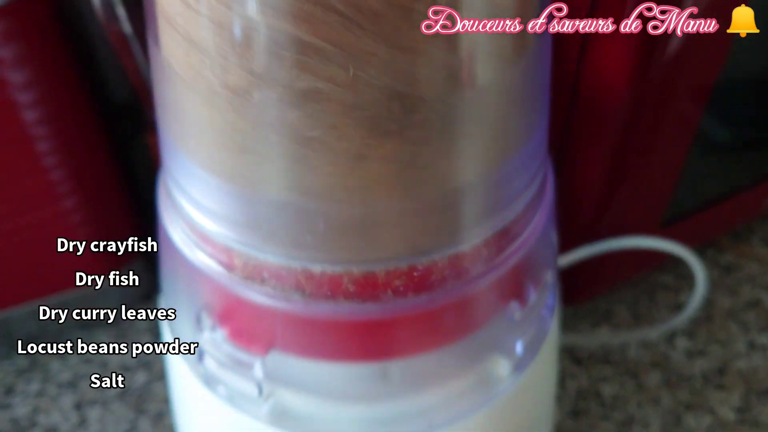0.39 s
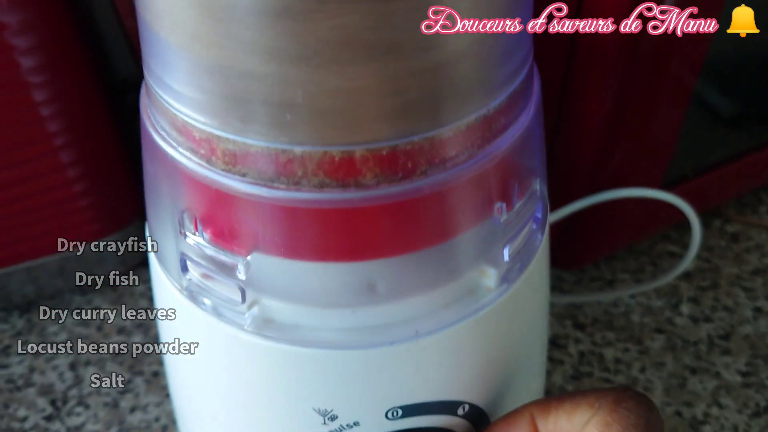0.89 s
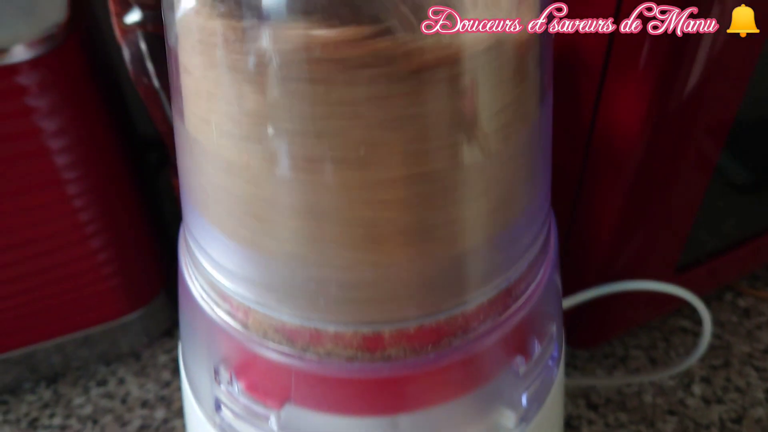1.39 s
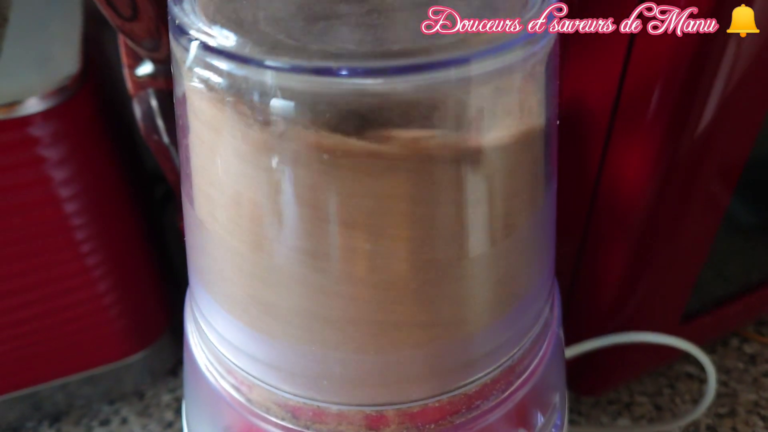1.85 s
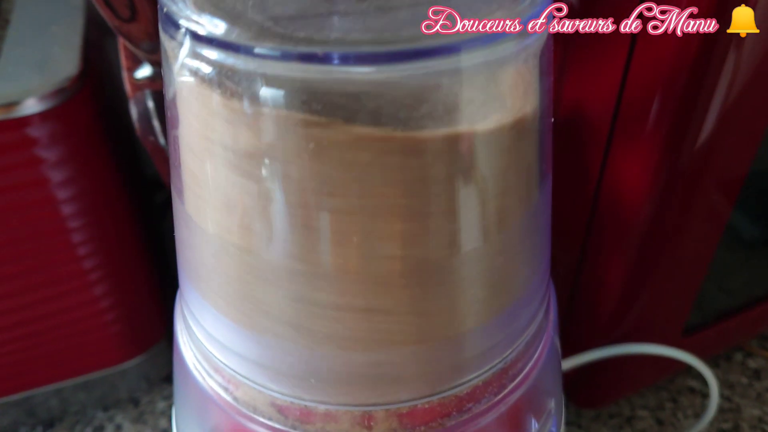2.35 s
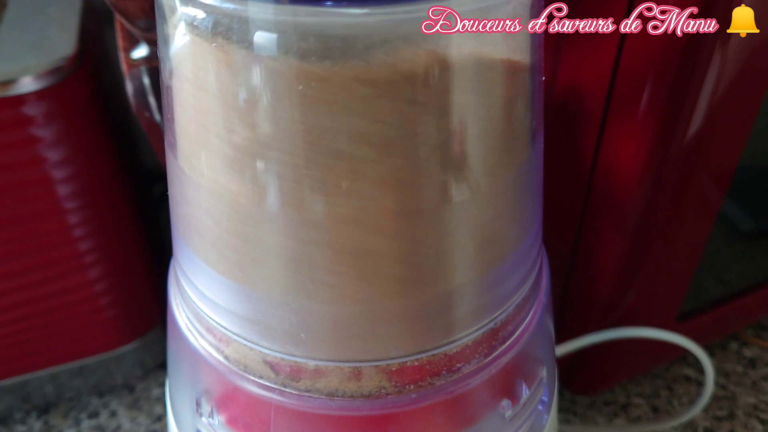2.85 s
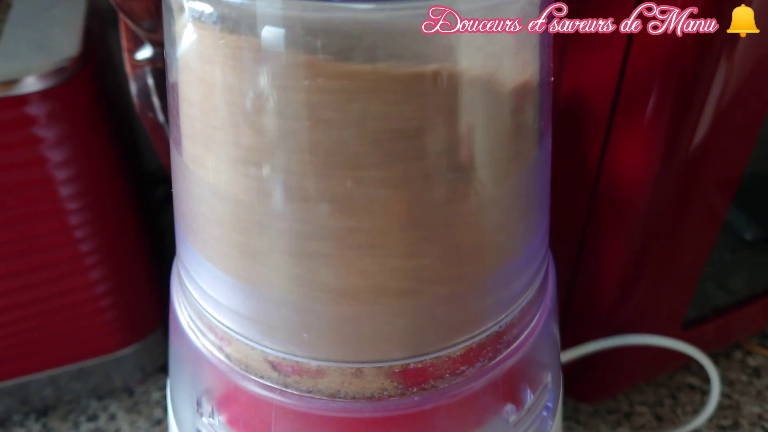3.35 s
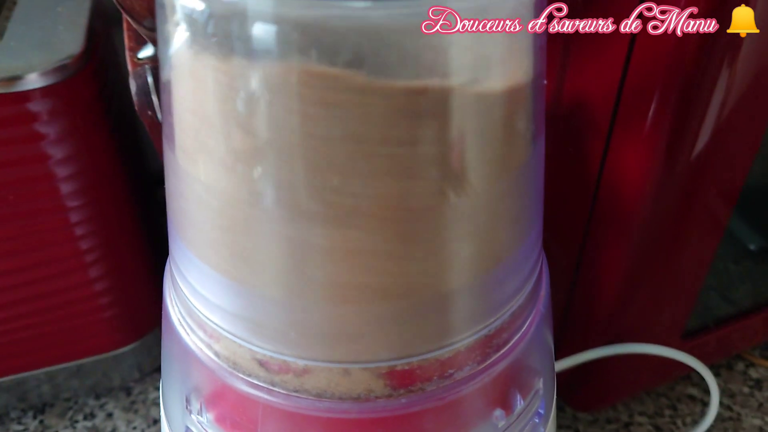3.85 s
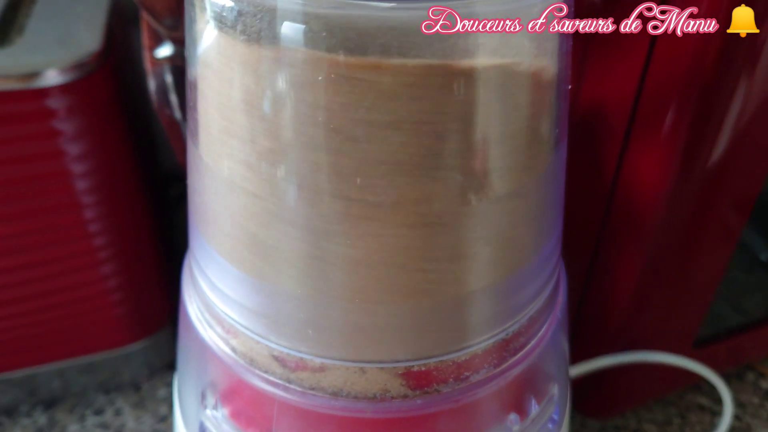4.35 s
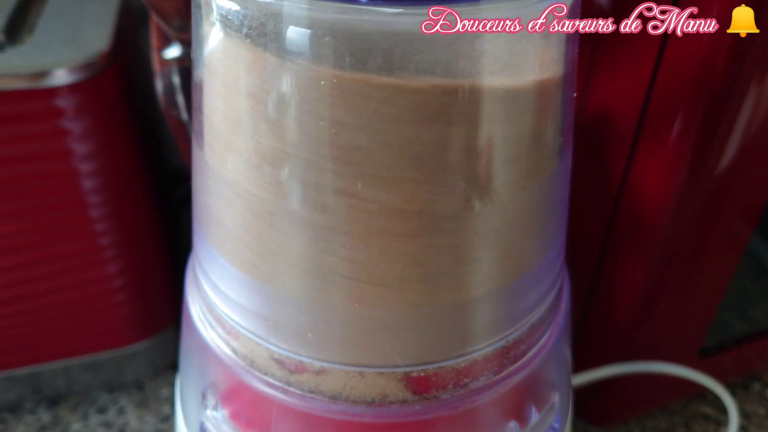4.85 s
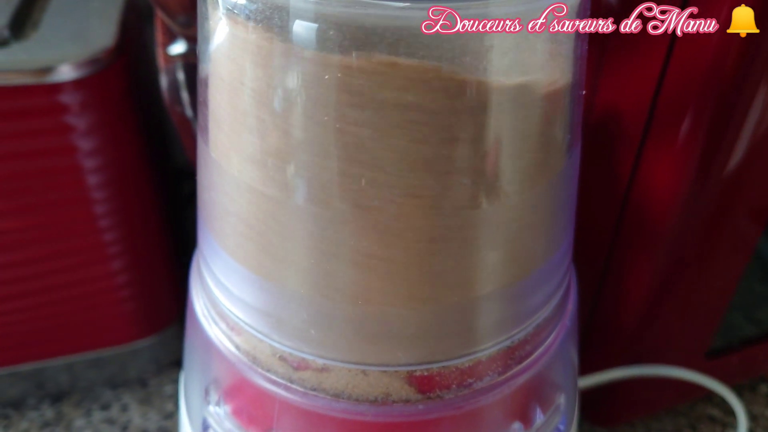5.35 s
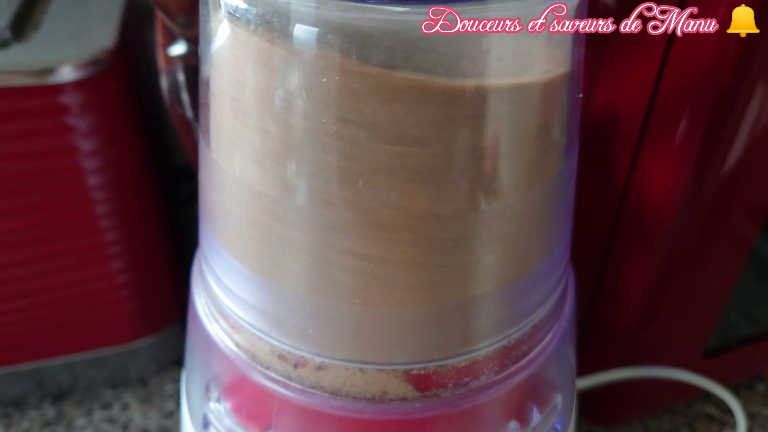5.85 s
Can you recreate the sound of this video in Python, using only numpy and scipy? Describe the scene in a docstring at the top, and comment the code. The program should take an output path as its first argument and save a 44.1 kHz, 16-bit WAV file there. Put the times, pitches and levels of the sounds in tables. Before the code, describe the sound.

A switch clicks and a small electric grinder spins up, roaring steadily as dry flakes pelt its plastic cup and turn to powder.

```python
"""In a quiet kitchen a finger taps a switch and presses it (ringing modes plus noise); the grinder's base jolts.
The blade spins up: grit (random impacts) pelts a plastic cup, exciting its wall modes and a treble sizzle.
Mains buzz and, from 1 s, a shaft hum run beneath; hard bits crack as noise bursts; the level often lulls or surges.
The grit gets louder and duller as flakes turn to powder, leans right at times, then fades quickly.
Two ports hear it close up, alike in the bass and unlike in the treble."""
import sys
import numpy as np
from scipy import signal
from scipy.fft import rfft, irfft, next_fast_len
from scipy.io import wavfile
from scipy.ndimage import uniform_filter1d

SR = 44100
rng = np.random.default_rng(int(sys.argv[2]) if len(sys.argv) > 2 else 0)


def dump_mix(stems):
    """Bounce the given channels to the path in sys.argv[1] as a 16-bit WAV at rate SR."""
    frames = np.atleast_2d(stems).T  # one column per channel
    limited = np.clip(frames, -1, 1)  # hard clip at full scale
    pcm = np.round(limited * 32767).astype(np.int16)
    wavfile.write(sys.argv[1], SR, pcm)


N = 263439
FFT_LEN = next_fast_len(N, True)
T = np.arange(N) / SR
HZ = np.maximum(np.fft.rfftfreq(FFT_LEN, 1 / SR), 1)
MAINS_HZ = 50


def undb(db):
    """Decibels to gain."""
    return 10 ** (np.asarray(db) / 20)


def unit(x):
    """Scale to rms 1."""
    return x / np.sqrt(np.mean(x ** 2))


def spectrum(x):
    """Transform, padded to a quick length."""
    return rfft(x, FFT_LEN)


def wave(bins):
    """Back to N samples."""
    return irfft(bins, FFT_LEN)[..., :N]


def across(table):
    """Table of (f/Hz, value) read at every bin, linear in log frequency."""
    hz, value = np.transpose(table)
    return np.interp(np.log(HZ), np.log(hz), value)


def colour(x, table):
    """Filter by (f/Hz, gain/dB) points; rms 1."""
    return unit(wave(spectrum(x) * undb(across(table))))


def walk(rate_hz):
    """Random levels held 1 / rate_hz and slewed; rms 1."""
    hold = int(SR / rate_hz)
    steps = np.repeat(rng.standard_normal(N // hold + 1), hold)
    return unit(uniform_filter1d(steps, hold)[:N])


# power share alike in both ports: f/Hz, share [0-1]
PORT_LIKENESS = [(60, 0.7), (300, 0.76), (700, 0.87), (1500, 0.3), (2800, 0.24), (5000, 0.17), (9000, .15),
                 (15000, 0.07)]


def pair():
    """Two-port noise, alike in the bass, mostly unrelated in the treble; left hears the shared part early."""
    left_lead_s = 0.00022
    shared, left, right = spectrum(rng.standard_normal((3, N)))
    share = np.clip(across(PORT_LIKENESS), 0, 1)
    early = np.exp(2j * np.pi * HZ * left_lead_s)
    alike = np.sqrt(share) * shared * np.array([early, np.ones_like(early)])
    unlike = np.sqrt(1 - share) * np.array([left, right])
    return wave(alike + unlike)


def tail(x, decay_s):
    """Sharp rise, exponential fall."""
    return signal.lfilter([1], [1, -np.exp(-1 / (decay_s * SR))], x)


def ring(x, hz, width_hz):
    """One resonance."""
    return signal.lfilter(*signal.iirpeak(hz, hz / width_hz, fs=SR), x)


def struck(rows, modes, rise_cycles):
    """Each blow rings every mode, slightly off pitch; its last column weights modes below 500 Hz."""
    out = np.zeros(N)
    t = T[:SR // 2]
    detune = rng.standard_normal((len(rows), len(modes)))
    for (s, db, low_db), offsets in zip(rows, detune):
        for (hz, mode_db, t60_s), offset in zip(modes, offsets):
            decay = undb(db + mode_db + low_db * (hz < 500) - 60 * t / t60_s)
            rise = np.minimum(t * hz / rise_cycles, 1)
            tone = np.sin(2 * np.pi * hz * (1 + 0.016 * offset) * t)
            out[int(s * SR):][:len(t)] += decay * rise * tone
    return out


def bursts(rows, decay_s, tone):
    """Decaying noise bursts at listed times, optionally placed left or right."""
    kicks = np.zeros((2, N))
    for s, db, *pan_db in rows:
        kicks[:, int(s * SR)] = undb(db + sum(pan_db) * np.array([.5, -.5]))
    return colour(pair(), tone) * tail(kicks, decay_s)


def pelting(rate_hz, scatter_db, decay_s, bed):
    """Envelope of random impacts of uneven size over a constant bed of fine powder."""
    hit = rng.random(N) < rate_hz / SR
    size = np.minimum(rng.exponential(1, N), 3)
    return bed + unit(tail(hit * undb(scatter_db * size), decay_s))


# background noise shape: f/Hz, relative density/dB
KITCHEN_TONE = [(24, -35.5), (40, 5.5), (200, -18), (348, -3.5), (565, -25), (786, -5), (1020, -11),
                (4210, -14.5), (7800, -23), (10100, -61), (17200, -120)]


def kitchen():
    """Steady coloured noise of the quiet kitchen."""
    return undb(-66.5) * colour(pair(), KITCHEN_TONE)


# port balance: f/Hz, left minus right/dB
PORT_BALANCE = [(60, 2.5), (110, -3.5), (230, -14.5), (400, -0.5), (550, -3), (900, -1.5), (1350, -6),
                (2300, -2.5), (3300, -5), (4700, 0), (6900, -6), (8000, -1), (11400, -0.5), (15000, 0)]


def room(near):
    """Walls answer each port with its own decaying noise echo; the ports differ in tone."""
    t60_s, echo_db = .3, -15
    echo = rng.standard_normal((2, N)) * undb(-60 * T / t60_s) * (T > .003)
    response = 1 + undb(echo_db) * spectrum(echo / np.linalg.norm(echo[0]))
    sides = undb(across(PORT_BALANCE) * np.array([[.5], [-.5]]))
    return wave(spectrum(near) * response * sides)


# finger finds the switch, then presses it: t/s, relative level/dB, low-mode weight/dB
SWITCH_TOUCHES = [(.031, -60, 11), (0.12, -42, -11), (0.314, -17, -11)]
# switch modes: f/Hz, relative level/dB, t60/s
SWITCH_MODES = [(392, -10, 0.11), (767, -13, 0.091), (1405, -20, 0.039), (2190, -1.5, 0.017),
                (3300, -12, 0.024), (3540, -24, 0.013), (5380, -17, .015)]


def switch():
    """Touches ring the switch modes and add short noise."""
    ringing = struck(SWITCH_TOUCHES, SWITCH_MODES, rise_cycles=1.8)
    tone = [(150, -20), (400, -32), (800, 7), (3500, 0), (7000, -13.0), (8500, -48)]
    noise = bursts([row[:2] for row in SWITCH_TOUCHES], decay_s=0.024, tone=tone)
    return ringing + undb(-12.5) * noise


# base jolts on the counter as the motor kicks in: t/s, relative level/dB, low-mode weight/dB
BASE_JOLTS = [(.332, -18.5, -3.5), (.392, -18, -9), (.422, -17.5, -17), (.437, -20, -20), (.46, -20, -13),
              (.497, -25, -23), (.53, -22.5, -15)]
# base modes: f/Hz, relative level/dB, t60/s
BASE_MODES = [(60.3, 3.5, 0.14), (138, -10, 0.16), (237, 3, 0.079), (312, 0.5, 0.13), (773, -1.5, 0.15),
              (773, -6, 0.034), (966, -5.5, 0.11)]


def jolts():
    """Jolts ring the decaying modes of the base."""
    return struck(BASE_JOLTS, BASE_MODES, rise_cycles=2.5)


# hard bits hit by the blade: t/s, relative level/dB, left minus right/dB
HARD_BITS = [(0.4278, -10, 1), (0.532, -12.5, 1), (0.6486, -11, -3), (0.8199, -12, 8), (0.9321, -12.5, -1),
             (0.9631, -13, 3), (1.0304, -10, -2), (1.3532, -11, 4), (1.4115, -15.5, -5), (1.5133, -11.5, 3),
             (1.654, -16.5, 4), (1.7453, -11, 7), (1.7662, -9.5, 0), (1.8675, -14, 3), (1.9807, -11, 0),
             (2.1757, -10, 2), (2.288, -9.5, -1), (2.4175, -10.5, 4), (2.4743, -13.5, 6), (3.0294, -11, -1),
             (3.1992, -13, 1), (3.2648, -17, 11), (3.3022, -13, 3), (3.5108, -14.5, -2), (3.8002, -13, -3),
             (4.2014, -11, 3), (4.5853, -14.5, -8), (5.498, -12, 4), (5.615, -13.5, -6),
             (5.7192, -9.5, -0.5), (5.82, -17, -5)]


def cracks():
    """Each hard bit breaks as a few milliseconds of bright noise."""
    tone = [(800, -33), (3000, -3), (6500, 6), (8200, -5.0), (12500, 0), (15900, -10), (16100, -59)]
    return undb(-4.5) * bursts(HARD_BITS, decay_s=0.0047, tone=tone)


# brief level changes, mostly a lull, then often a surge; a negative lull rises, a negative surge dips:
# t/s, lull length/s, lull depth/dB, surge/dB
LEVEL_SWINGS = [(.6, 0.12, 2.5, 2), (0.884, 0.023, 7, 8), (1.088, 0.086, 3.5, 9.5), (1.28, 0.037, -2, 2.5),
                (1.422, 0.063, 6, -1), (1.663, 0.046, -1.5, 3.5), (1.779, 0.078, 6.5, 5.5),
                (1.925, 0.16, 2.5, 9), (2.354, 0.042, 3.5, 0.5), (2.486, 0.092, 9, 6.5),
                (2.815, 0.078, 3, 6), (3.032, 0.072, 6, -1.5), (3.418, 0.059, 4, -0.8), (3.508, .1, 2, 3),
                (3.825, 0.079, 5, 4), (3.954, 0.13, 1, 7.5), (4.294, .04, 0, 6), (4.416, 0.098, 4, 0),
                (4.659, 0.17, 2, 3), (4.942, 0.073, 1.5, -1.5), (5.14, 0.1, 3, -2), (5.503, 0.21, 1.5, 5.5)]


def swing_db(lull_share, surge_share):
    """Brief lulls and decaying surges of level, as far as one layer follows them."""
    drop_s, slump_s, settle_s = 0.014, .015, 0.067
    s, length_s, lull_db, surge_db = np.transpose(LEVEL_SWINGS)[..., None]
    t = T[::64]
    since_back = t - s - length_s
    gone = .5 + .5 * np.tanh((t - s) / drop_s)
    back = .5 + .5 * np.tanh(since_back / slump_s)
    surge = surge_db * back * np.exp(-np.maximum(since_back, 0) / settle_s)
    lull = lull_db * (gone - back)
    return np.interp(T, t, (surge_share * surge - lull_share * lull).sum(axis=0))


# unbalanced shaft: t/s, turning rate f/Hz, hum level/dB re grind level
SHAFT_TURNS = [(1.0, 206, -37), (2.0, 217, -34), (2.45, 220, -28), (3, 220, -28.5), (3.6, 221, -24.5),
               (4.3, 223, -25), (4.65, 222, -26), (4.85, 222, -22), (5.3, 224, -22), (5.88, 227, -19)]


def shaft():
    """Unbalance hums at the turning rate, wavering slightly and following the level swings."""
    s, hz, db = np.transpose(SHAFT_TURNS)
    turning_hz = np.interp(T, s, hz) * (1 + 0.0012 * walk(14))
    phase = 2 * np.pi * np.cumsum(turning_hz) / SR
    level = undb(np.interp(T, s, db, left=-90) + 2.4 * walk(9))
    return undb(swing_db(1.5, 1)) * np.sqrt(2) * level * np.sin(phase)


# motor buzz: f/Hz, mean level/dB re grind level
MAINS_TONES = [(50, -52), (100, -43), (150, -33)]


def motor_buzz():
    """Mains harmonics wander in level and phase."""
    out = np.zeros(N)
    for hz, db in MAINS_TONES:
        out += undb(db + 4.3 * walk(4.4)) * np.sin(2 * np.pi * hz * T + 0.67 * walk(4.6))
    return out


# base rumble shape: f/Hz, relative density/dB
RUMBLE_TONE = [(18, -44), (30, -27.5), (75, -27.5), (130, -1.5), (178, -13.5), (322, 1), (397, -2.5),
               (538, -3.5), (700, -1.5), (910, -6), (1540, -120)]


def rumble(knocks):
    """Knocks shake the base: low coloured noise following the level swings."""
    gain = undb(swing_db(0.89, 0.85) + 2.8 * walk(11) - 4.0)
    return gain * colour(pair() * knocks, RUMBLE_TONE)


def wall_ring(knocks):
    """Knocks ring the cup's lowest wall mode; two cascaded resonances make it steep on both sides."""
    hz, width_hz = 777, 168
    gain = undb(swing_db(0.81, 0.77) + 1.74 * walk(14))
    return gain * unit(ring(ring(pair() * knocks, hz, width_hz), hz, width_hz))


# treble sizzle shape: f/Hz, relative density/dB
SIZZLE_TONE = [(4700, -47), (7600, 1.5), (8300, -4), (9000, 1.5), (9900, 0), (11200, 6), (12000, 1),
               (13500, 3), (15850, 2.5), (16050, -44)]


def sizzle(blows, churn, flicker_db):
    """Fine hard bits add short treble ticks on top of the grit's blows."""
    ticks = blows + pelting(rate_hz=120, scatter_db=9.0, decay_s=0.0011, bed=.2) * 1.25
    gain = undb(swing_db(0.99, 0.26) + flicker_db)
    return gain * colour(pair() * ticks * churn, SIZZLE_TONE)


# upper wall modes: f/Hz, width/Hz, left gain/dB, right gain/dB
CUP_MODES = [(1059, 30, 2, -1), (1098, 13.3, -5.5, -19), (1175, 13.7, -5, -1), (1426, 26, 3.5, -37),
             (1638, 197, -31, -1), (1720, 69, -12.5, -9), (1800, 11, -19, -1.5), (2045, 23, 9, -25),
             (2304, 25, -20, -8), (2870, 7.7, 10, 5), (2910, 24, 0.5, -2.5), (3116, 108, 7.5, -23),
             (3540, 18, 11, -8), (3930, 110, -2.5, -18), (4253, 74, -5, -6), (4440, 100, 10.5, -6.5),
             (5500, 180, -17, -4), (5930, 240, 9.5, -11), (7220, 400, -29, -3.5)]


def cup_wall(hits):
    """Hits ring the wall modes, each at its own strength and sign per port; each level flickers at random."""
    common = .8  # power share of the left drive in the right
    drive = np.array([hits[0], np.sqrt(common) * hits[0] + np.sqrt(1 - common) * hits[1]])
    out = np.zeros((2, N))
    for k, (hz, width_hz, *port_db) in enumerate(CUP_MODES):
        gain = undb(np.reshape(port_db, (2, 1)) + 2.08 * walk(15))
        out += gain * ring(drive, hz, width_hz) * [[1], [(-1) ** k]]
    return out


# slow drift: t/s, left minus right of grit body/dB, of sharp edge/dB
BALANCE_DRIFT = [(0.35, 0, -2), (.7, -4.5, -5.5), (1.5, -0.5, -1), (2.5, -3.5, -2), (3.9, -2, -0.5),
                 (4.3, -2, 4.5), (5.85, -1.5, 4.5)]
# brief leans to the right: t/s, lean/dB
RIGHT_LEANS = [(.72, 0), (1.08, 3), (1.47, 9), (1.83, 4.5), (2.0, 5), (2.82, 3), (3.08, 2.5), (4.24, 3),
               (4.64, 5), (4.96, 1.5), (5.63, 5), (5.86, 3.5)]


def balance():
    """Port gains of the grit's body and edge: slow drift plus brief leans."""
    lean_width_s = 0.053
    t, *drift_db = np.transpose(BALANCE_DRIFT)
    lean_db = sum(db * np.exp(-((T - s) / lean_width_s) ** 2) for s, db in RIGHT_LEANS)
    return [undb((np.interp(T, t, db) - lean_db) * np.array([[.5], [-.5]])) for db in drift_db]


# filter on hits plus cup modes: f/Hz, relative gain/dB
GRIT_TONE = [(350, -20.5), (600, -16), (756, -3), (1090, -1), (1270, -2.5), (1650, -1.5), (2400, -3),
             (4290, -8), (5010, -9.5), (7350, -8.5), (8300, -22), (10800, -48), (18300, -120)]


def grit(blows, churn, swing, sharp, flicker_db):
    """Flakes pelt the cup; coarse ones sound sharp, fine powder dull, so body and edge are split and mixed."""
    edge_hz = 3870
    hits = pair() * blows * churn
    pelted = colour(hits + cup_wall(hits), GRIT_TONE)
    edge = signal.sosfilt(signal.butter(4, edge_hz, "high", fs=SR, output="sos"), pelted)
    body = signal.sosfilt(signal.butter(4, edge_hz, fs=SR, output="sos"), pelted)
    body_side, edge_side = balance()
    edge_gain = undb(4.5 + swing_db(0.9, 0.47) + 0.85 * flicker_db) * sharp
    return swing * body * body_side + edge_gain * edge * edge_side


# spin-up, then louder and duller as powder gets finer; last four before layer trims:
# t/s, level/dB, sharp edge/dB re level, sizzle/dB re level, base rumble/dB re level, wall ring/dB re level
GRIND_COURSE = [(0.316, -26, -26, -7, -13, -25), (0.33, -35, -13, -17, -1, -20),
                (0.34, -22, -16, -16, -12, -25), (0.375, -27.5, -8, -11, 1.5, -15),
                (0.45, -25.5, 0, -3, -12, -14.5), (1.501, -25.5, -2, -4.5, -12, -10),
                (2.5, -23.5, -1, -6.5, -15, -11.5), (3.5, -19, -4, -10, -13, -16.5),
                (4.5, -20, -5, -9.5, -13, -18.5), (5.3, -15.5, -9, -14.5, -14, -17.5),
                (5.85, -23, -7.5, -11, -9, -24.5)]


def grinder():
    """All layers follow the level swings; mains-rate torque pulses roughen grit and sizzle; the treble flickers."""
    s, *columns = np.transpose(GRIND_COURSE)
    level, sharp, sizzle_gain, rumble_gain, ring_gain = (undb(np.interp(T, s, c)) for c in columns)
    flicker_db = 1.5 * walk(30)
    swing = undb(swing_db(0.96, 1))
    pulse = 0.091 * np.sin(2 * np.pi * MAINS_HZ * T)
    double_pulse = 0.014 * np.sin(2 * np.pi * 2 * MAINS_HZ * T)
    churn = (1 + pulse + double_pulse) * undb(0.59 * walk(25))
    blows = pelting(rate_hz=370, scatter_db=1.5, decay_s=0.0011, bed=3.7)
    knocks = pelting(rate_hz=88, scatter_db=9.0, decay_s=0.014, bed=2.1)
    out = grit(blows, churn, swing, sharp, flicker_db)
    out = out + sizzle_gain * sizzle(blows, churn, flicker_db)
    out = out + ring_gain * wall_ring(knocks)
    out = out + rumble_gain * rumble(knocks)
    out = out + swing * motor_buzz() + shaft()
    return out * level * (T > s[0])


def scene():
    """Grinder, jolts and switch pass through the room; cracks and kitchen noise are added directly."""
    near = grinder() + jolts() + switch()
    return room(near) + cracks() + kitchen()


def low_pass(x):
    """Removes everything above the highest recorded frequency."""
    return signal.sosfilt(signal.butter(12, 16960, fs=SR, output="sos"), x)


def record(dry):
    """Sound opens just after the start and fades quickly at the end."""
    start_s, rise_s, end_s, fade_s = 0.027, 0.0074, 5.871, .012
    opening = np.clip((T - start_s) / rise_s, 0, 1)
    closing = np.clip((end_s - T) / fade_s, 0, 1) ** 2
    return low_pass(dry * (opening * closing))


dry = scene()
out = record(dry)
dump_mix(out)
```